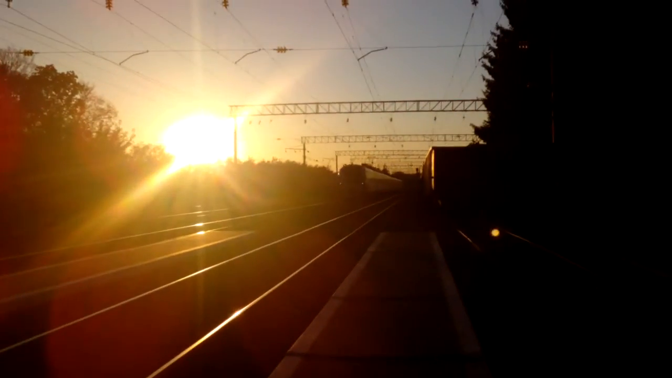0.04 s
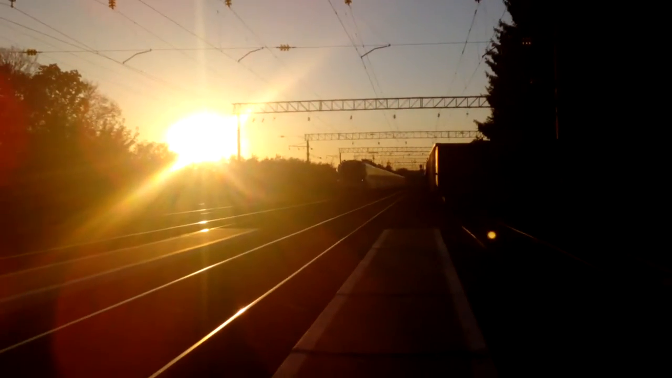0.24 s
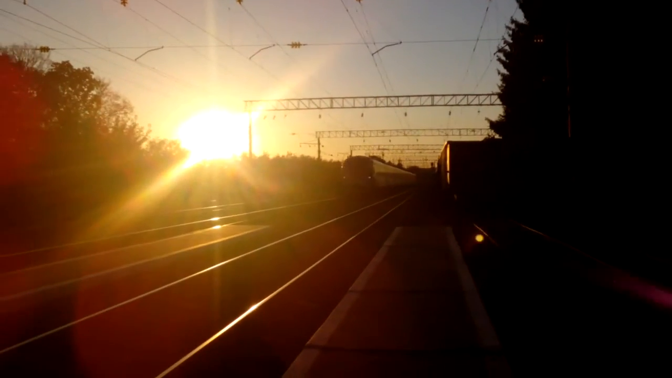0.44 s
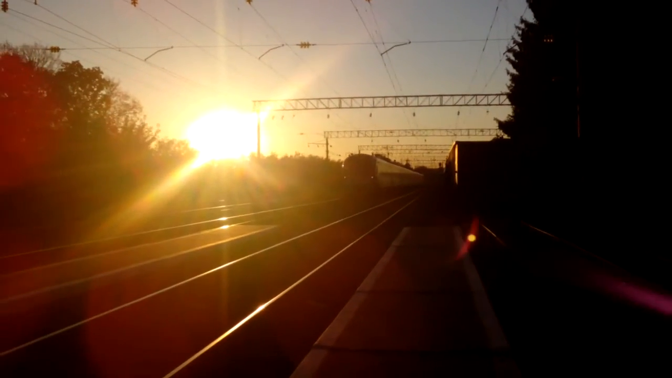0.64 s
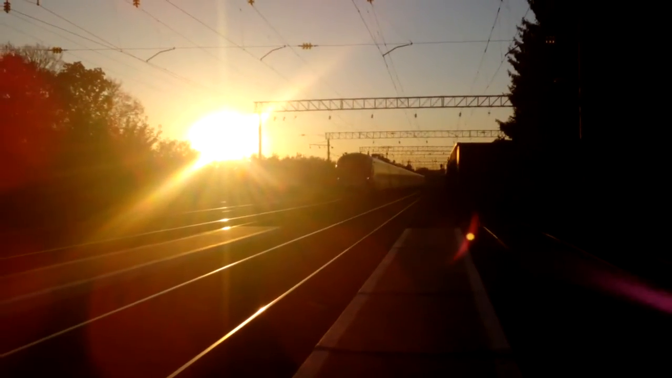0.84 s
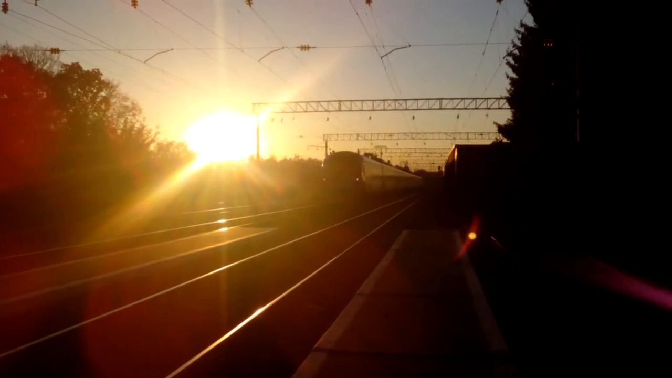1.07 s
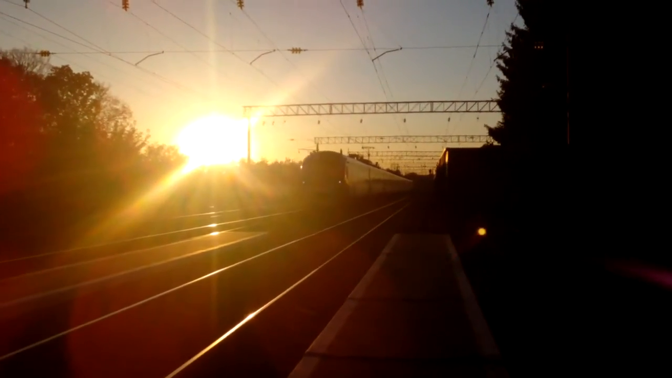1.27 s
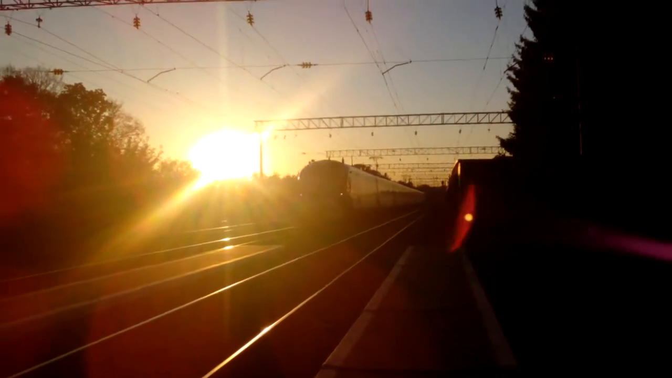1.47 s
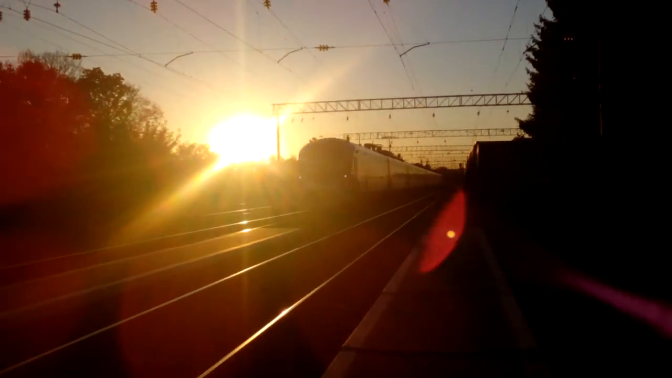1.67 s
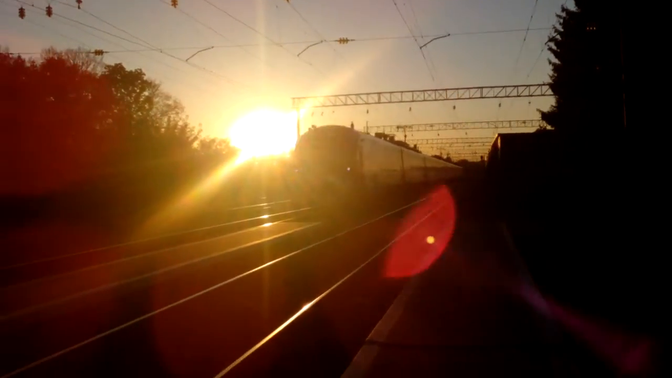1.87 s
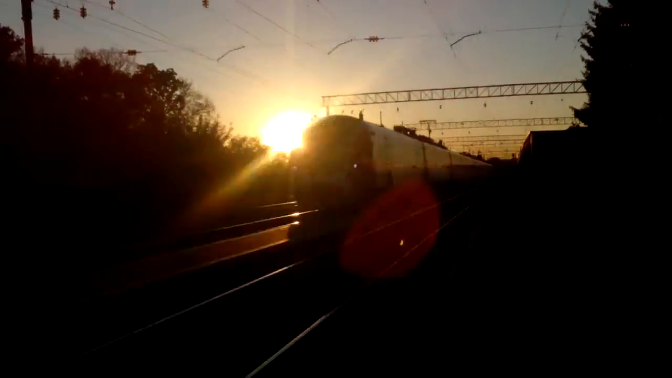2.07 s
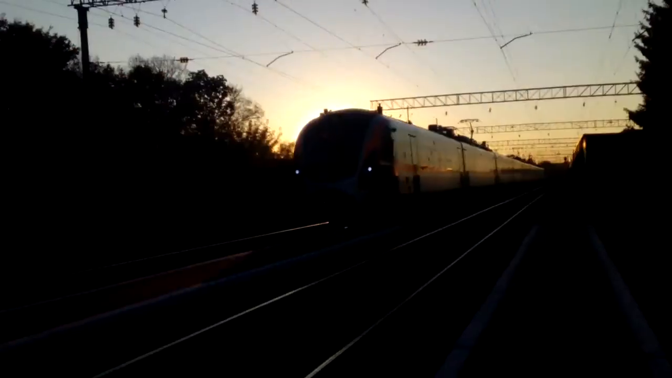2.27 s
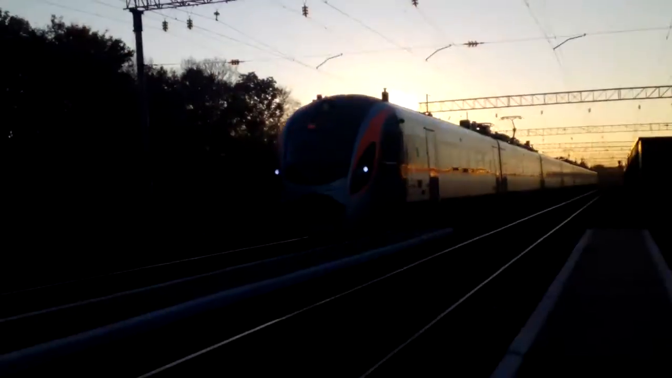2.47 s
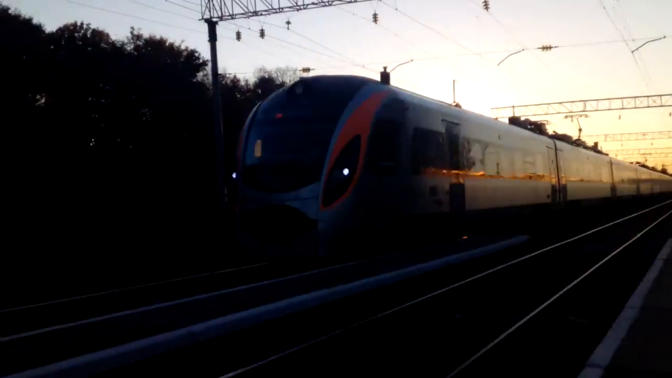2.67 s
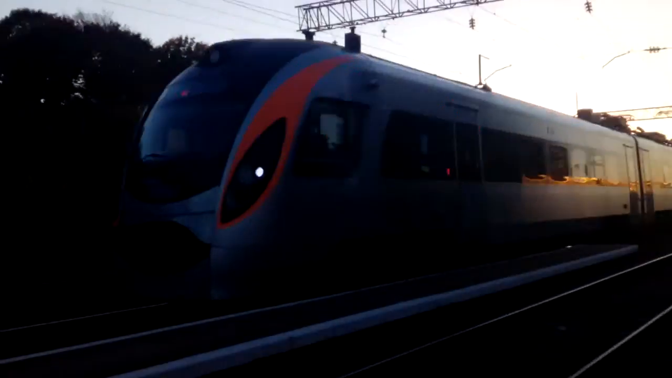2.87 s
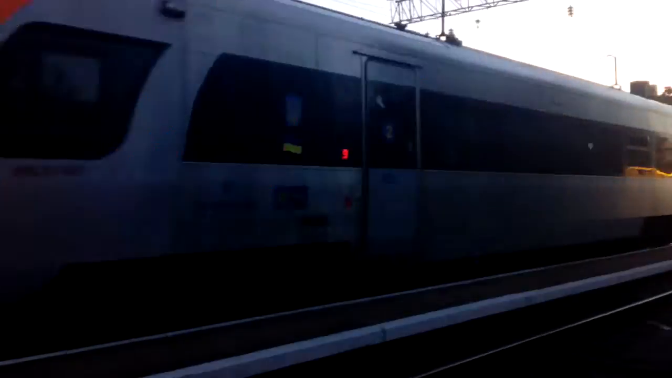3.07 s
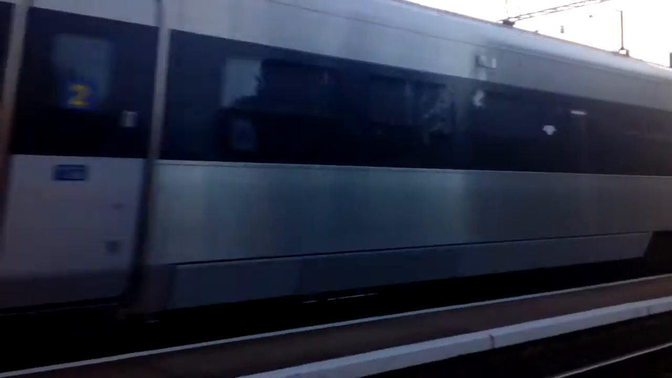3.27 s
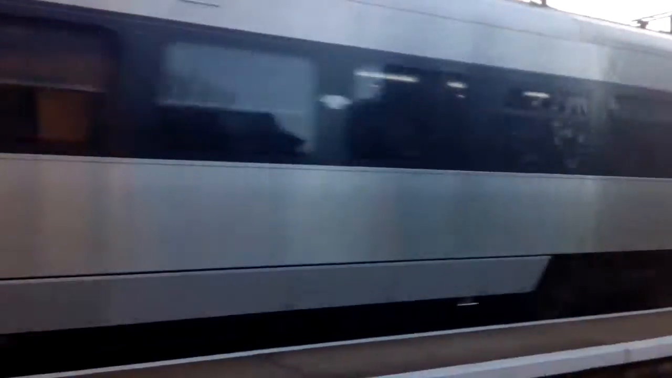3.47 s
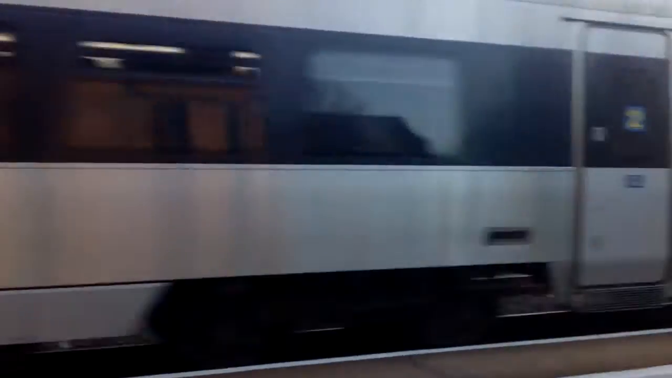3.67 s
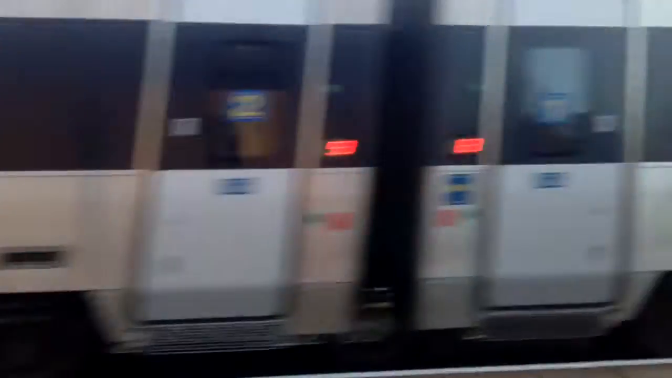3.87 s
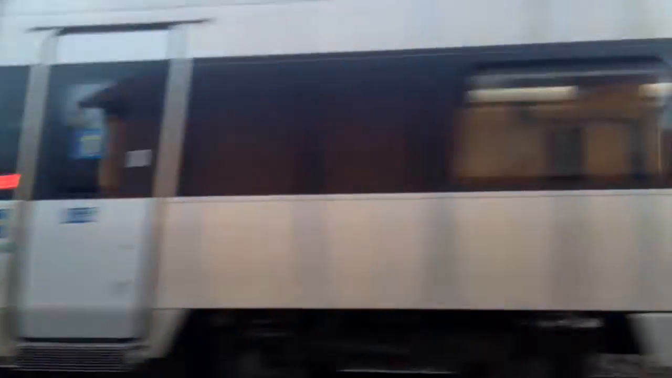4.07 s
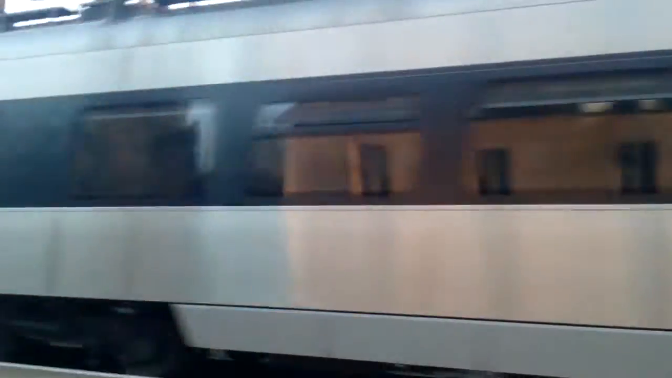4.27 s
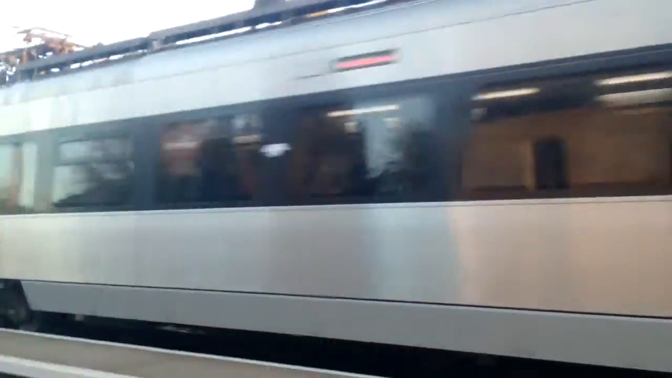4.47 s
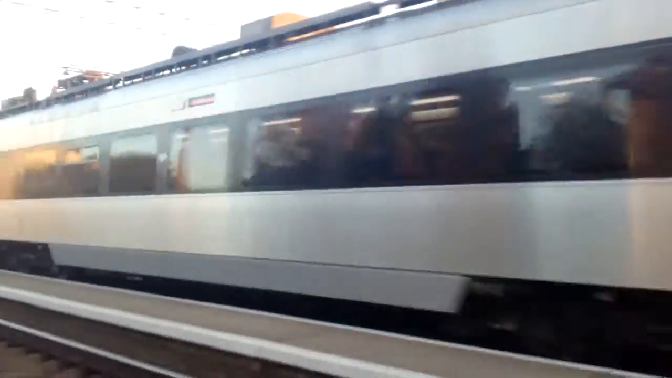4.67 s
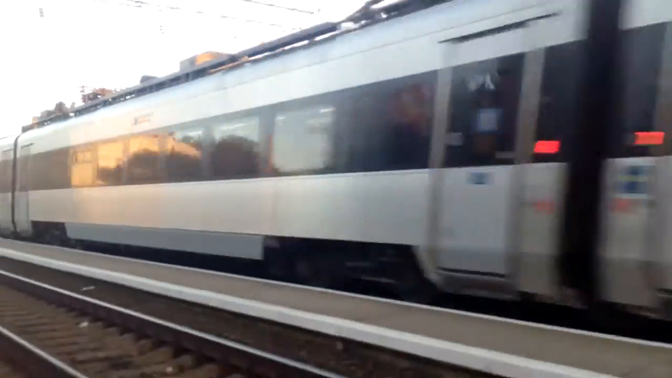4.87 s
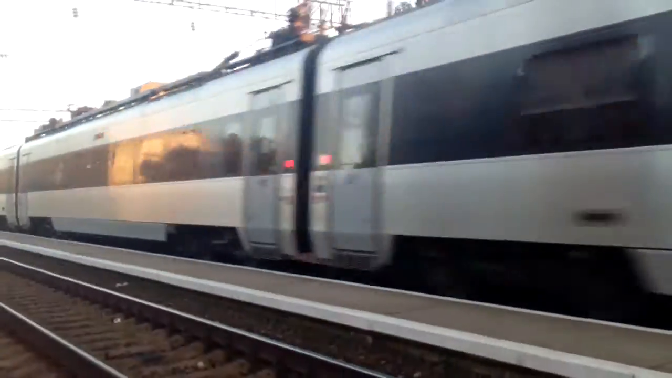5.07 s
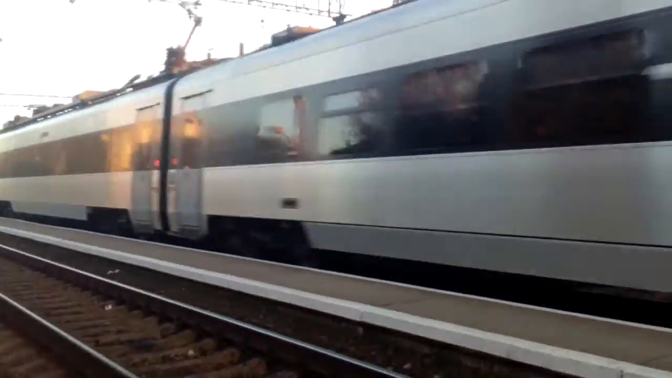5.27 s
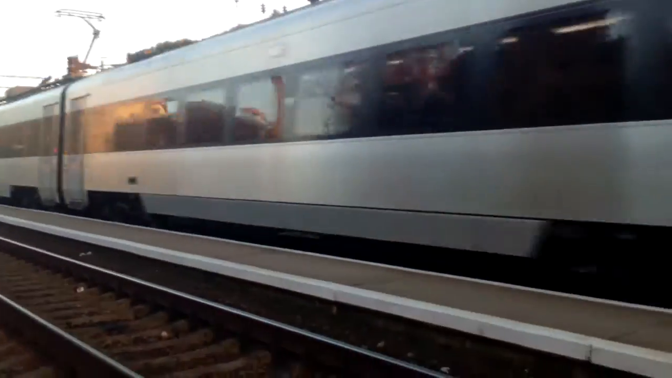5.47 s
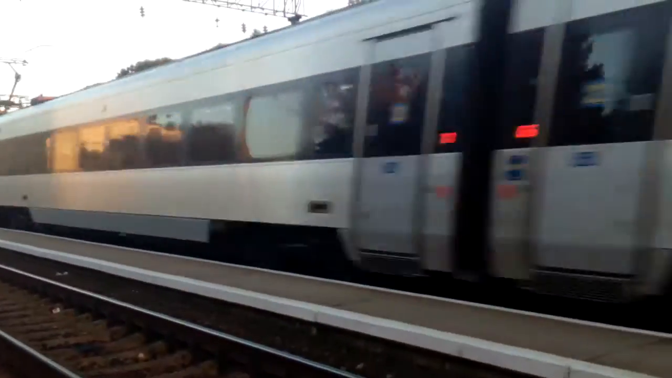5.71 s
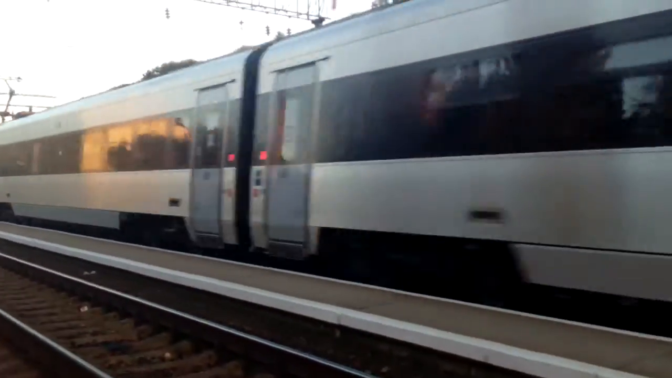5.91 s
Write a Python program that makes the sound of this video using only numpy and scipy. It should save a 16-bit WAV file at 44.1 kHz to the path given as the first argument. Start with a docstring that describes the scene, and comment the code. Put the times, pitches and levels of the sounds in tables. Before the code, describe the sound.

Passenger train approaches and runs past very close: low rumble, then full rushing roar with heavy paired joint thumps and metallic clanks.

```python
"""A distant rumble and roar swell as an electric passenger train nears a platform and runs past a hand-held camera.
Wheels on rail are five bands of shaped noise, rumble, sleepers, rolling, hiss and sizzle, that follow every axle.
Axles thump over rail joints with a bending dip and short rings; flange tones groan and chirp now and then.
The sound swings from ahead to the left of the two microphone ports as the camera turns after the train,
and its peaks touch full scale."""
import sys
import numpy as np
from scipy import signal
from scipy.fft import rfft, irfft, next_fast_len
from scipy.io import wavfile
from scipy.ndimage import uniform_filter1d, map_coordinates

SR = 44100
rng = np.random.default_rng(int(sys.argv[2]) if len(sys.argv) > 2 else 0)


def generate_wav(signal):
    """Clip the signal to [-1, 1] and save it as 16-bit WAV at the path in sys.argv[1]."""
    frames = np.transpose(np.atleast_2d(signal))
    scaled = np.clip(frames, -1, 1) * 32767
    pcm = np.round(scaled).astype(np.int16)
    wavfile.write(sys.argv[1], SR, pcm)


N = 262031
FRAME = 2048  # samples in one spectral frame

# Axles striking rail joints, all levels relative within their own layer. Each row: time in seconds,
# thump in dB, nominal thump pitch in Hz, knock in dB, clank in dB, rattle in dB.
JOINT_BLOWS = [(0.241, -34, 182, -40, -35, -39.5), (0.328, -36.5, 150, -45, -38, -47),
               (0.429, -31, 98, -53.5, -39, -50), (0.772, -31, 96, -50, -49, -57),
               (1.144, -39, 157, -44, -32.5, -52), (1.273, -26.5, 236, -37, -25, -33.5),
               (1.357, -26, 118, -42, -29, -38), (1.579, -46, 96, -33, -37, -53),
               (2.324, -36, 178, -23, -45, -39), (2.411, -34, 149, -25, -39, -34),
               (2.652, -31, 101, -33, -35, -30.5), (2.738, -31, 165, -24, -38, -38),
               (2.959, -14, 144, -15, -23, -28), (3.048, -17, 159, -25, -18, -31),
               (3.201, -3, 148, -9, -13, -21), (3.288, -5, 138, -10, -11.5, -20),
               (3.405, -5.5, 114, -7, -32, -24), (3.492, -7, 130, -15, -16, -23),
               (3.556, -10, 142, -22, -29, -36), (3.711, -5, 132, -7.5, -10.5, -21.5),
               (3.794, -4.5, 158, -24, -13.5, -22), (3.84, -13, 150, -27, -22, -32),
               (3.915, -9, 130, -7, -13.5, -29), (3.998, -3.5, 130, -4, -22, -17),
               (4.085, -5, 128, -28, -28, -18.5), (4.201, -7, 118, -8, -32, -20),
               (4.266, -11, 146, -24, -28, -21), (4.289, -8.5, 132, -28, -31, -21.5),
               (4.326, -10, 129, -18, -15, -24), (4.507, -7.5, 127, -4.5, -20, -25),
               (4.555, -11, 142, -20, -15, -38), (4.59, -4, 149, -9, -17, -21),
               (4.666, -9, 132, -26, -32, -30), (4.704, -5.5, 120, -7, -31, -26),
               (4.792, -6, 137, -3, -18, -18), (4.88, -6.5, 141, -9, -11, -19.5),
               (4.997, -10, 126, -11, -18, -24), (5.061, -10.5, 132, -18, -26, -30),
               (5.084, -16, 153, -10, -28, -24), (5.121, -19, 137, -22, -28, -30),
               (5.303, -6, 120, -2.5, -13, -22), (5.354, -18, 156, -20, -20, -35),
               (5.386, -6, 139, -6, -10.5, -19.5), (5.408, -10, 155, -20, -26, -36),
               (5.508, -11, 139, -8, -24, -28), (5.518, -23, 139, 0, -24, -28),
               (5.589, -6, 139, -1.5, -19, -21), (5.631, -17, 118, -22, -24, -30),
               (5.676, -6, 140, -4, -8, -22), (5.793, -7.5, 122, -4.5, -31, -27),
               (5.859, -12, 150, -11, -24, -30), (5.879, -10, 167, -7, -20, -24)]


def amp(db):
    """Amplitude ratio of a level in dB."""
    return 10 ** (np.asarray(db) / 20)


def unit(x):
    """Scale to an rms of 1."""
    return x / np.sqrt(np.mean(x ** 2) + 1e-20)


def along(points, hz):
    """Read (Hz, value) points on a log frequency axis."""
    point_hz, values = np.transpose(points)
    return np.interp(np.log(hz + 1), np.log(point_hz + 1), values)


def curves(rows, t):
    """Read each column after the time at times t."""
    seconds, *columns = np.transpose(rows)
    return [np.interp(t, seconds, column) for column in columns]


def wobble(rate):
    """A smooth random curve with rate knots a second."""
    knots = rng.standard_normal(int(N * rate / SR) + 4)
    return map_coordinates(knots, [np.arange(N) * rate / SR])


def blend(tables, hz, place):
    """Mix neighbouring frequency tables by the place of the wheels."""
    place = np.clip(place, 0, len(tables) - 1)
    return sum(along(points, hz) * np.maximum(1 - abs(place - k), 0) for k, points in enumerate(tables))


def axle_times():
    """Seconds after the first axle at which each axle passes a fixed point."""
    cars = 9
    car_s, bogies_s = .796, .510  # car to car, front to rear bogie
    front_axles_s, rear_axles_s = .087, .083  # axle to axle in each bogie
    car = [0, front_axles_s, bogies_s, bogies_s + rear_axles_s]
    return (car_s * np.arange(cars)[:, None] + car).ravel()


def passing(abreast, reach, axle_db, lead_db, growth, background_db, turned_db):
    """Level in dB of all axles together: each follows inverse-square distance and is screened once gone by."""
    gone_db = -5.5  # screening of one axle, before growth
    turn_s = 3.6, 4.35  # start and end of the camera's turn after the train
    t = np.arange(0, N + 256, 256) / SR
    axles = axle_times()
    u = (t[:, None] - abreast - axles) / reach
    screen = 1 + (amp(gone_db) ** 2 - 1) * (1 + np.tanh(u)) / 2
    leading_bogie = np.arange(len(axles)) < 2
    near = (screen / (1 + u ** 2)) @ amp(lead_db * leading_bogie) ** 2
    power = amp(axle_db) ** 2 * near ** growth + amp(background_db) ** 2
    level_db = 10 * np.log10(power) + np.interp(t, turn_s, [0, turned_db])
    return np.interp(np.arange(N) / SR, t, level_db)


def rush(spectra, patchy_db):
    """Two noises of steady strength whose colour follows the train, with patches of random gain."""
    # Colour against distance. Each row: time in seconds, nearness (0 far, 1 near, 2 abreast, 3 gone by).
    nearness = [(0, 0), (1.1, .1), (2, 1), (2.5, 1.1), (2.95, 2), (4, 2.1), (4.6, 3), (5.94, 3)]
    hz, t, z = signal.stft(rng.standard_normal((2, N)), SR, nperseg=FRAME)
    gain = amp(blend(spectra, hz[:, None], curves(nearness, t)[0]))
    gain = gain / np.sqrt(np.mean(gain ** 2, axis=0))
    patches = uniform_filter1d(rng.standard_normal(z.shape[1:]), size=8, axis=0)  # across frequency
    patches = uniform_filter1d(patches, size=3, axis=1)  # across time
    coloured = z * gain * amp(patchy_db * unit(patches))
    return unit(signal.istft(coloured, SR, nperseg=FRAME)[1][:, :N])


def blows(levels_db, rise, fall):
    """Power envelope of a shake that starts at each joint, with rise and fall times in seconds."""
    power, t = np.zeros(N + SR), np.arange(SR // 4) / SR
    shape = (1 - np.exp(-t / rise)) * np.exp(-t / fall)
    for start, db in zip(np.transpose(JOINT_BLOWS)[0], levels_db):
        power[round(start * SR):][:len(t)] += amp(db) ** 2 * shape
    return power[:N]


def wheels():
    """Rough wheels on rough rails: bands of noise, most of them shaken harder just after a joint."""
    # Noise colours of the train far off, near, abreast and gone by; a shorter set holds its last colour.
    # Each row: frequency in Hz, relative density in dB per Hz.
    rumble_colours = ([(13, -53), (22, -25), (38, -50), (57, -10.5), (75, 6), (118, -20.5), (194, -11.5),
                      (300, -17.5), (390, -43), (660, -120)], [(13, -47), (22, -21), (32, -34), (59, -1),
                      (75, -0.5), (181, -10), (221, -3), (300, -13), (390, -21), (660, -120)], [(13, -46),
                      (22, -11), (48, -8), (107, 2.5), (166, 2), (300, -2.5), (390, -57), (660, -120)],
                      [(13, -46), (22, -16), (113, -3), (161, -2), (205, -10), (300, -9), (390, -31),
                      (660, -120)])
    sleeper_colours = [(180, -47), (300, -28), (329, -9), (361, -15.5), (570, -20.5), (740, -54),
                       (1250, -120)], [(180, -42), (300, -3), (430, 0), (466, -0.5), (570, -10), (740, -36),
                       (1250, -120)], [(180, -32), (300, -13), (392, -0.5), (570, -5), (740, -7.5),
                       (1250, -120)]
    rolling_colours = ([(330, -38), (560, -14), (627, -3), (837, -3.5), (904, 0), (976, -7.5), (1060, -2),
                       (1110, -6), (1200, -2.5), (2300, -20), (2990, -25.5), (5060, -120)], [(330, -31),
                       (560, -15), (657, -2.5), (766, -8), (953, -2), (1040, -3.5), (1300, -4),
                       (1660, -14.5), (1870, -12.5), (2300, -18.5), (2990, -29), (5060, -120)], [(330, -18),
                       (560, -21), (722, -8.5), (942, -7.5), (1180, -10), (1490, -17.5), (1910, -18.5),
                       (2300, -22), (2990, -30), (5060, -120)], [(330, -57), (560, -18), (753, -10.5),
                       (1040, -5), (1260, -8.5), (1870, -14), (2300, -23.5), (2990, -42), (5060, -120)])
    hiss_colours = ([(1410, -15), (2400, -6), (2730, -8.5), (3570, -0.5), (4540, -5), (4800, -6),
                    (6570, -14), (6960, -22), (8200, -51), (10700, -66), (18000, -120)], [(1410, -16.5),
                    (2400, -9), (3070, -8), (3790, -6.5), (4180, -10), (4630, -7.5), (5750, -12),
                    (6410, -13), (8200, -34), (10700, -36), (18000, -120)], [(1410, -9), (2400, -8),
                    (2960, -0.5), (3370, -3.5), (3970, 0.5), (4360, -1.5), (5870, -5), (6640, -8),
                    (8200, -24.5), (10700, -40), (18000, -120)], [(1410, -22), (2400, -0.5), (3390, -4.5),
                    (4080, 0.5), (5080, -3.5), (6510, -8.5), (8200, -24), (10700, -51), (18000, -120)])
    sizzle_colours = ([(4880, -30), (8300, 0.5), (10500, 5), (11800, -2.5), (14100, -6), (15300, -14)],)
    # The pass of rumble, sleepers, rolling, hiss and sizzle. Each row: first axle abreast in seconds,
    # time from abreast at half power in seconds (before growth), axle level in dB, leading bogie over the
    # others in dB (before growth), growth with nearness (exponent), background in dB,
    # gain once the camera has turned in dB.
    bands = [(3.36, 0.36, -32, 0, 1.65, -46.5, -0.6), (3.395, 0.31, -32, 1.7, 2.17, -52.5, 1.5),
             (3.36, 0.42, -31, 3.5, 2.024, -46, 2), (3.374, 0.3, -36.5, 1.66, 1.91, -70, 1),
             (3.37, 0.39, -70, 2.5, 2.9, -106, 2.5)]
    rumble_db, sleepers_db, rolling_db, hiss_db, sizzle_db = (passing(*band) for band in bands)
    _, thump_db, _, knock_db, clank_db, rattle_db = np.transpose(JOINT_BLOWS)
    flutter = wobble(12)  # shared by rolling, hiss and sizzle

    thump = blows(thump_db - 17, rise=.015, fall=0.016)
    rumble = np.sqrt(amp(rumble_db + .8 * wobble(9)) ** 2 + thump)

    knock = blows(knock_db - 8, rise=.005, fall=.012)
    sleepers = np.sqrt(amp(sleepers_db + 1.03 * wobble(9.2)) ** 2 + knock)

    clank = blows(clank_db - 4.5, rise=0.014, fall=0.022)
    rolling = np.sqrt(amp(rolling_db + 0.2 * flutter + 0.53 * wobble(30)) ** 2 + clank)

    # the rattle comes in uneven flecks
    rattle = blows(rattle_db - 0.5, rise=0.0083, fall=0.014) * amp(4.2 * wobble(160))
    hiss = np.sqrt(amp(hiss_db + 0.53 * flutter) ** 2 + rattle)

    # the sizzle rises with the rattle's share of the hiss
    rattle_lift = (1 + rattle / amp(hiss_db) ** 2) ** 0.58
    sizzle = amp(sizzle_db + 0.51 * flutter + 1.4 * wobble(27)) * rattle_lift

    return (rumble * rush(rumble_colours, patchy_db=1.2)
            + sleepers * rush(sleeper_colours, patchy_db=-0.57)
            + rolling * rush(rolling_colours, patchy_db=0.77)
            + hiss * rush(hiss_colours, patchy_db=1.0)
            + sizzle * rush(sizzle_colours, patchy_db=3.5))


def swells(x):
    """The roar swells or sags in one band at a time, smoothly in time and pitch."""
    # Each row: middle in seconds, half length in seconds, centre in Hz, half width in octaves, lift in dB.
    moments = [(2.8, 0.65, 430, .35, 2.5), (3.12, 0.13, 830, 0.55, 3), (3.3, 0.078, 760, 0.3, 3.5),
               (3.12, .2, 3970, 0.11, 2.5), (1.32, 0.35, 2240, 0.44, 3), (3.704, 0.065, 480, 0.38, 3),
               (3.74, 0.16, 780, 0.33, 2), (3.9, 0.067, 450, .3, 0.5), (4.35, 0.24, 1160, 0.47, 2.5),
               (4.65, 0.48, 1800, 0.43, 2.5), (4.84, 0.17, 447, .35, 2.5), (5.2, 0.23, 820, 0.46, 2.5),
               (5.505, 0.13, 464, 0.53, 0), (5.77, 0.31, 246, 0.28, 6.5), (5.877, 0.17, 860, 0.54, 3),
               (3.62, .07, 3900, .7, -2), (4.83, .05, 3800, 0.37, 3), (5.21, .07, 4500, .7, -1.5),
               (5.46, .05, 4200, .7, -2), (5.75, .06, 4400, .6, 1), (5.22, 0.066, 450, .5, -2),
               (5.05, 0.062, 450, 0.31, 2), (5.57, .06, 580, 0.27, 2.5)]
    hz, t, z = signal.stft(x, SR, nperseg=FRAME)
    lift_db = 0
    for middle, half, mid_hz, octaves, db in moments:
        off_pitch = np.log2((hz[:, None] + 1) / mid_hz) / octaves
        lift_db = lift_db + db * np.exp(-off_pitch ** 2 - ((t - middle) / half) ** 2)
    return signal.istft(z * amp(lift_db), SR, nperseg=FRAME)[1][:, :N]


def flange():
    """Wheel flange and rail sing briefly: short tones of drifting phase, low groans and high chirps."""
    # Each row: start in seconds, length in seconds, pitch in Hz, level in dB.
    chirps = [(0.238, .022, 760, -34.5), (1.246, 0.044, 904, -29), (1.354, .02, 760, -31),
              (2.325, .04, 419, -28), (2.386, 0.032, 350, -26), (2.421, 0.044, 434, -32),
              (2.725, .055, 455, -26.5), (2.96, .025, 3980, -30), (3.11, .04, 3900, -30),
              (3.196, .03, 4100, -28), (3.29, .03, 4000, -28), (3.324, .02, 10300, -44),
              (4.856, 0.02, 10350, -38), (4.9, .025, 10250, -39), (4.945, .04, 10350, -47)]
    out = np.zeros(N)
    for start, length, hz, db in chirps:
        t = np.arange(round(length * SR)) / SR
        walk = uniform_filter1d(np.cumsum(rng.standard_normal(len(t))), size=90)
        drift = walk * 0.047 * (hz / 10000) ** .25
        tone = np.sin(2 * np.pi * hz * t + drift)
        out[round(start * SR):][:len(t)] += amp(db) * np.sin(np.pi * t / length) * tone
    return out


def ring(modes, t):
    """One blow: every mode decays from a new strength and phase, with a soft start."""
    scatter_db = rng.normal(0, 2.6, len(modes))
    phases = rng.uniform(0, 2 * np.pi, len(modes))
    tones = 0
    for (hz, db, t60), extra_db, phase in zip(modes, scatter_db, phases):
        tones = tones + amp(db + extra_db - 60 * t / t60) * np.sin(2 * np.pi * hz * t + phase)
    return tones * (1 - np.exp(-t / .005))


def thumps():
    """The rail end dips and springs back in little more than one sinking cycle, then rebounds once;
    sleepers and steel ring briefly."""
    # What a blow rings in the sleepers, and in wheel and rail.
    # Each row: frequency in Hz, relative level in dB, 60 dB decay time in seconds.
    wood = [(390, 0, .06), (460, -1, .05), (560, -1, .04)]
    steel = [(675.5, 4.5, 0.12), (743, 8, 0.037), (818, 10, 0.04), (900, 4.5, 0.082), (1085, 1, 0.048),
             (1870, -30, 0.029), (3970, -19, .05), (4700, -5, .04)]
    out, t = np.zeros(N + SR), np.arange(SR // 10) / SR
    swell = (t / 0.0061 * np.exp(1 - t / 0.0055)) ** 2
    for start, db, hz, knock_db, clank_db, _ in JOINT_BLOWS:
        # the pitch sinks towards 0.74 of nominal
        cycles = hz * (0.74 * t + 0.3 * 0.011 * (1 - np.exp(-t / 0.0092)))
        dip = amp(db - 0.2) * swell * np.sin(2 * np.pi * cycles + 2.75)
        knock = amp(knock_db - 6) * ring(wood, t)
        clank = amp(clank_db - 8) * ring(steel, t)
        at = round(start * SR)
        out[at:][:len(t)] += dip + knock + clank
        rebound = at + round(.043 * SR)
        out[rebound:][:len(t)] += amp(-11.5) * dip
    # the thumps carry no deep bass
    return signal.sosfilt(signal.butter(2, 65, "high", fs=SR, output="sos"), out[:N])


def at_ports(one, other):
    """Two signals become left and right with the likeness, delay and lean of the train's place."""
    # Where the nearest wheels are. Each row: time in seconds,
    # place (0 ahead, 1 abreast, 2 gone by), lead of the left port in ms.
    places = [(0, 0, -.16), (2.5, .1, -.16), (3, 1, -.16), (3.4, 1, -.14), (3.7, 1, 0), (4.1, 1.2, .16),
              (4.5, 2, .33), (5.94, 2, .35)]
    # For ahead, abreast and gone by. Each row: frequency in Hz, left-right likeness (0 to 1, before phase mixing).
    likeness = ([(60, .99), (170, .97), (345, .9), (520, .6), (860, .38), (1030, .45), (1380, .25),
                (1900, .43), (2250, .63), (6500, .56), (8000, .2), (13000, .1)], [(60, .99), (170, .97),
                (345, .92), (520, .66), (860, .58), (1200, .42), (1550, .45), (1900, .18), (13000, .05)],
                [(60, .99), (170, .97), (345, .93), (520, .78), (700, .64), (1000, .38), (1550, .6),
                (1900, .42), (2750, .38), (4000, .25), (13000, .05)])
    # For ahead, abreast and gone by. Each row: frequency in Hz, left over right in dB.
    leans = [(60, 0.5), (92, 1), (140, 1.5), (210, 0.5), (330, 1.5), (500, 1.5), (770, -1), (1170, -0.5),
             (1790, 2.5), (2740, 3), (4190, 0.5), (6410, -1.5), (9810, 10), (15000, 28)], [(60, 0),
             (92, 2.5), (140, 1.5), (210, 1), (330, 2), (500, 2), (770, -1), (1170, 1), (1790, 2.5),
             (2740, 3), (4190, 0.5), (6410, -2.5), (9810, 8), (15000, 13)], [(60, 1.5), (92, 2), (140, 1),
             (210, 2), (330, 1.5), (500, 0), (770, 0.5), (1170, 0), (1790, 3), (2740, 5), (4190, 4),
             (6410, -0.5), (9810, 11), (15000, 18)]
    # The camera body turns the phase of sound from ahead. Each row: frequency in Hz, lag of the left in radians.
    body_shadow = [(170, 0), (520, 0), (860, .8), (1030, 2.2), (1380, 3.1), (1550, 3.2), (1900, 5.7),
                   (2750, 6.2), (5200, 5.8), (6500, 5)]
    hz, t, (a, b) = signal.stft([one, other], SR, nperseg=FRAME)
    hz = hz[:, None]
    place, lead_ms = curves(places, t)
    ahead = np.clip(1 - place, 0, 1)
    # sound from ahead and from the side share the ports, each with its own phase
    delay = np.exp(2j * np.pi * hz * lead_ms / 1000)
    cross = ahead * np.exp(-1j * along(body_shadow, hz)) + (1 - ahead) * delay
    spread = np.arccos(np.clip(blend(likeness, hz, place) * abs(cross), 0, 1)) / 2
    lean = amp(blend(leans, hz, place) / 2)  # half of it on each port
    mid, side = a * np.cos(spread), b * np.sin(spread)
    left = (mid + side) * lean
    right = (mid - side) / lean * np.exp(-1j * np.angle(cross))
    return signal.istft(np.array([left, right]), SR, nperseg=FRAME)[1][:, :N]


def scene():
    """The roar of the wheels with thumps and flange tones, as it reaches the two microphone ports."""
    one, other = swells(wheels())
    return at_ports(one + thumps() + flange(), other)


def record(dry):
    """The converter clips at full scale and keeps nothing above its band limit."""
    top_hz = 15400
    size = next_fast_len(N + SR)
    spectrum = rfft(np.clip(dry, -1, 1), size)
    spectrum = spectrum * (np.fft.rfftfreq(size, 1 / SR) < top_hz)
    return np.clip(irfft(spectrum, size)[:, :N], -1, 1)


dry = scene()
out = record(dry)
generate_wav(out)
```